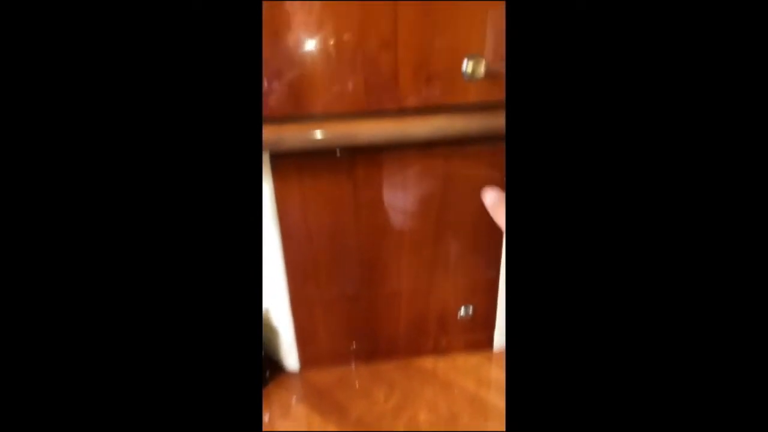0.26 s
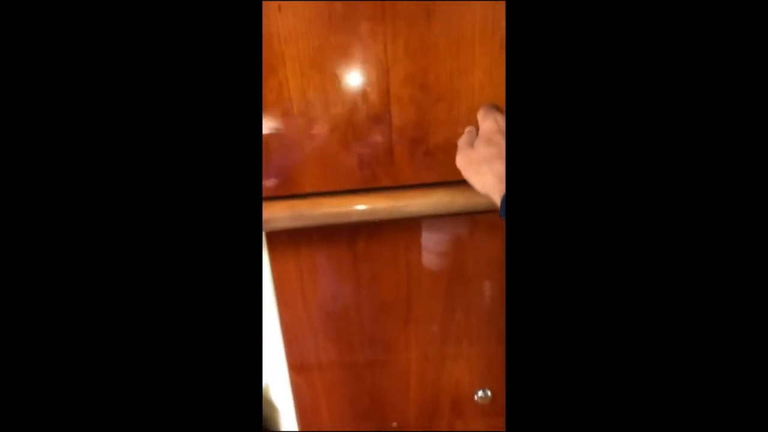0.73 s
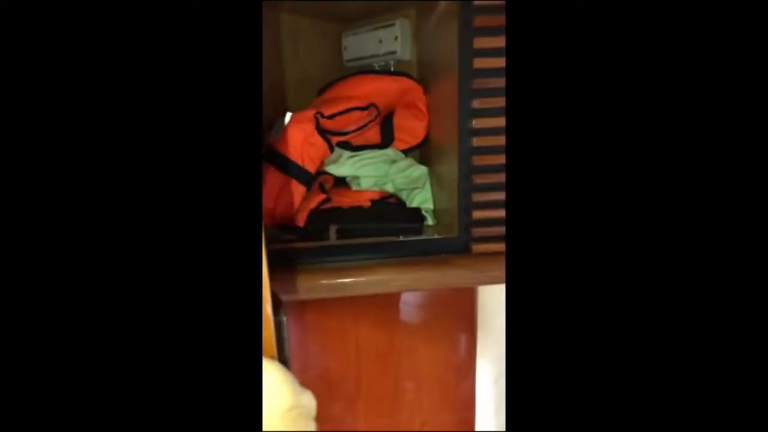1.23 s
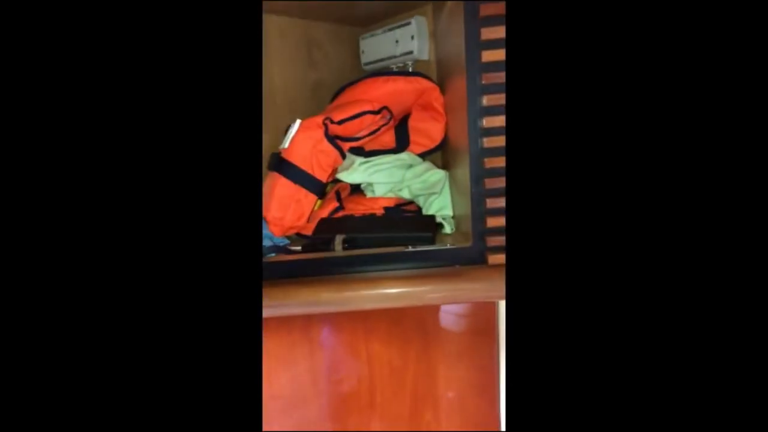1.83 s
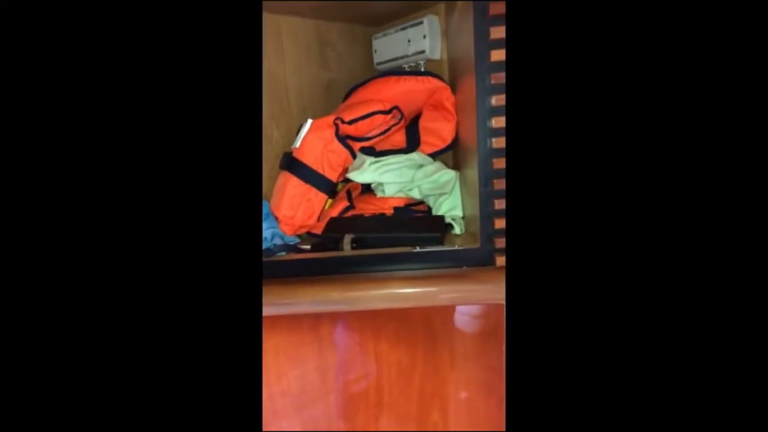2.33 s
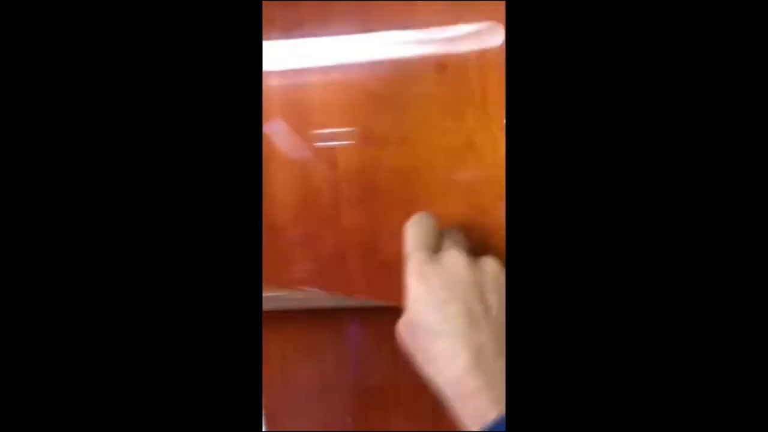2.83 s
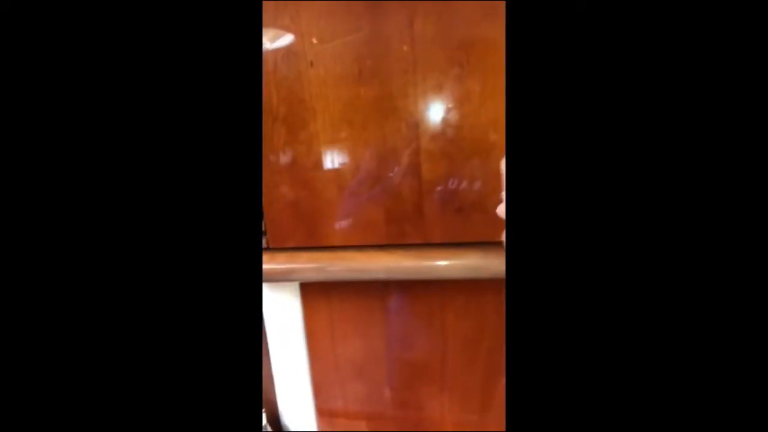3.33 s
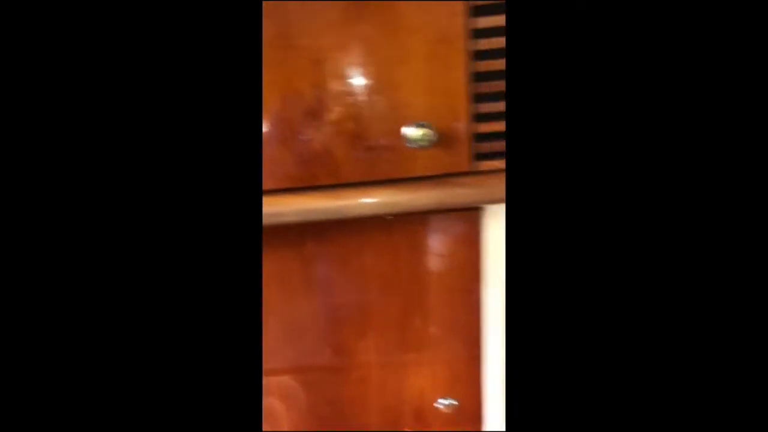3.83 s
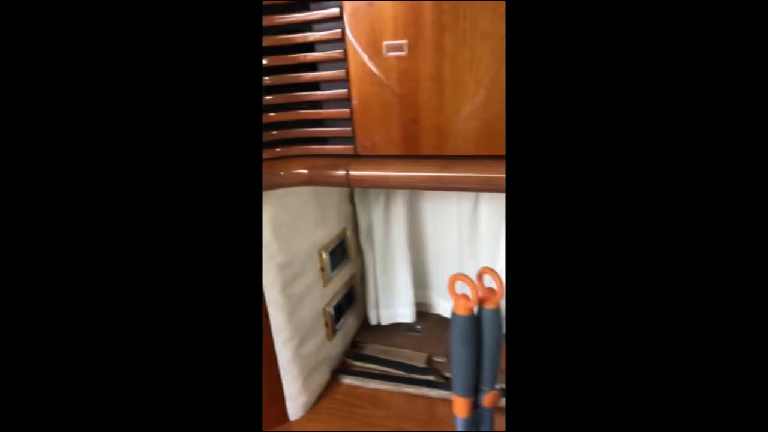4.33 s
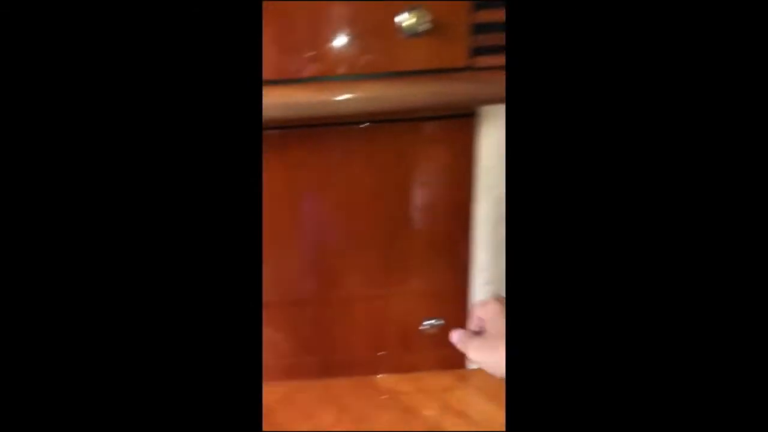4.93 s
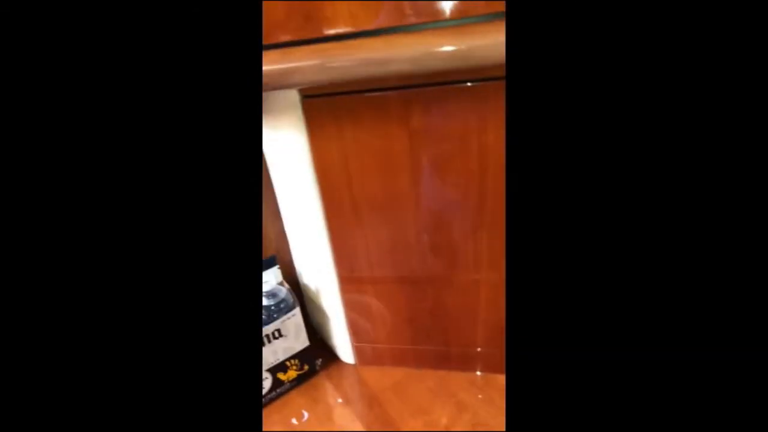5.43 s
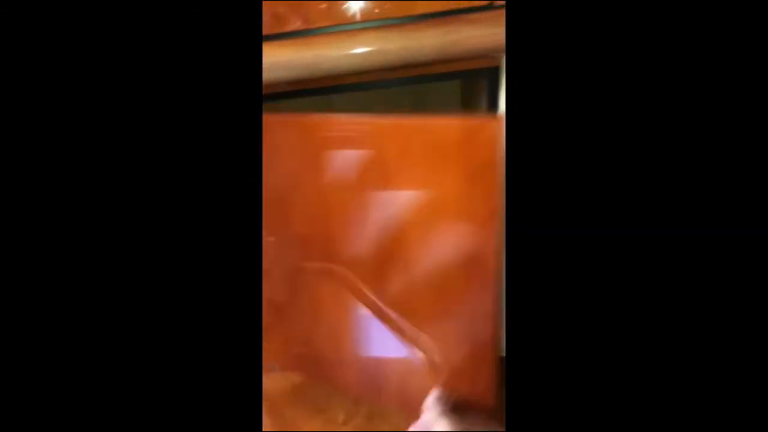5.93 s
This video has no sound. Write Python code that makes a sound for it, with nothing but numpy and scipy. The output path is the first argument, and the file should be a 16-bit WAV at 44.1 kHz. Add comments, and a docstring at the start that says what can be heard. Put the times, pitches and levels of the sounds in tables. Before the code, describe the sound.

A faint low hush fills a small, hard-walled boat cabin, heard close up with short reflections. From 0 s a hand and sleeve brush softly over wood, with a tap near 0.3 and a firmer knock near 0.7. Between 0.85 and 1.3 small wooden knocks, scrapes and metallic latch clicks accompany the door opening; a dull, sinking thud lands at 1.4. Then it is nearly quiet, with only faint touches and rubbing until about 3.1. At 3.28 the door bangs shut, hard and boomy, with a latch click, and another knock and click lock it near 3.5. Soft shelf bumps come around 4.1-4.4. At 5.3 a second latch clicks, then a rapid cluster of bright metal snaps and a wooden crack rings out at 5.5-5.6. Light knocks, rubbing and low puffs of air follow as the door swings out, with a soft thud near 6.0 and a final click-knock at 6.13.

```python
"""First a hand and sleeve brush softly over wood, then varnished locker doors are worked in a boat cabin.
A push-button latch is pressed, a door is pulled open, later banged shut and locked.
Something bumps a shelf, then a second latch snaps and its door swings out; the cabin rings briefly.
Wood and metal are ringing sine modes with bursts of noise, rubbing is a stream of noisy slips,
and the cabin, the moving air and the quiet background are shaped noise."""
import sys
import numpy as np
from scipy import signal
from scipy.fft import rfft, irfft, next_fast_len
from scipy.io import wavfile

SR = 44100
rng = np.random.default_rng(int(sys.argv[2]) if len(sys.argv) > 2 else 0)


def digitize_waveform(pressure):
    """Quantize a signal to 16-bit integers and store it at the path in sys.argv[1].

    Rows of a 2-D input are taken as channels; values are limited to [-1, 1].
    """
    field = np.atleast_2d(pressure).T
    bounded = np.clip(field, -1, 1)
    quanta = np.round(bounded * 32767).astype(np.int16)
    wavfile.write(sys.argv[1], SR, quanta)


N = 271962
TIME = np.arange(N) / SR
EDGES = 22 * 2 ** np.arange(0, 9.6, .5)   # half-octave band edges in Hz
CENTRES = np.sqrt(EDGES[1:] * EDGES[:-1])

# the quiet cabin: pitch_hz, level_db (per Hz, relative)
HUSH = [(18, -56), (30, -12.5), (141, -0.5), (184, 1.5), (215, -7), (245, -8), (394, -12), (437, -12),
        (540, -18), (702, -17.5), (988, -22), (3060, -29), (6050, -31.5), (13700, -39.5), (16000, -44)]
HUSH_DB = -65.5
# colour of the moving air: pitch_hz, level_db (per Hz, relative)
RUMBLE = [(25, -22.5), (48, -5), (75, -6), (130, -12), (250, -25.5), (600, -55)]
# puffs of air pushed over the microphone by a swinging door or arm: peak_s, level_db
PUFFS = [(.46, -57.5), (1.0, -66), (1.45, -57), (2.82, -69), (3.2, -54.5), (3.48, -58), (4.2, -62),
         (5.33, -55), (5.78, -47.5), (6.061, -42.5)]
PUFF_S, STILL_AIR_DB = 0.046, -74.5
# cabin reverberation: pitch_hz, level_db, t60_s (time to fade by 60 dB)
CABIN = [(102, -21.5, 0.6), (350, -6.5, 0.27), (1005, -7.5, 0.21), (3040, -7, .33), (7032, -11, 0.44),
         (16040, -20.5, 0.42)]
# echoes from the nearest walls, shelf and ceiling: delay_s, level_db
ECHOES = [(.0021, -20.5), (.0037, -14), (.0058, -7.5), (.0083, -10), (0.0126, -11.5), (.0161, -14.5),
          (.0223, -21.5)]

# hand, sleeve and latch barrel sliding: start_s, length_s, level_db, panel_pressure_db
STROKES = [(0, 0.069, -62.5, 4), (0, 1, -70.5, -18), (0.287, 0.098, -47, -7.5), (0.672, 0.25, -53.5, -2),
           (1.135, 0.063, -47.5, 9), (1.699, 0.28, -69, 7), (2.747, 0.99, -75.5, 17),
           (3.481, 0.093, -57, 11), (4.979, 0.53, -63, -11.5), (5.313, 0.043, -49.5, 8.5),
           (5.457, 0.079, -52.5, 2), (5.516, 0.079, -42, 2.5), (5.836, 0.11, -61, -16),
           (6.077, 0.17, -48, -7)]
RISE_SHARE = 0.43   # part of a stroke spent building up
TREBLE_DB, DULLING = -7, 0.39   # treble of a stroke; dB of it lost for each dB of pressure
# colour of the sliding hiss: pitch_hz, level_db (per Hz, relative)
FRICTION = [(300, 5.5), (600, -1.5), (1200, -1.5), (2400, -1), (4000, -1.5), (7000, -8), (11000, -9),
            (15000, -17.5)]
# hinge and push-button barrel rub and sing faintly: peak_s, rise_s, fall_s, level_db
CHAFES = [(0.859, 0.01, 0.019, -52.5), (2.97, 0.18, 0.18, -77), (3.527, 0.003, 0.014, -48.5),
          (3.607, 0.022, 0.024, -62), (5.152, 0.092, 0.41, -82), (5.46, 0.0057, 0.02, -90)]
# the notes they sing: pitch_hz, level_db, t60_s
CHAFE_MODES = [(887, 9.5, 0.066), (2200, 7, 0.053), (3040, -20.5, 0.0051), (4400, -1, 0.027)]

# blows that shake the whole locker: start_s, level_db
SHAKES = [(1.401, -53.5), (3.282, -24.5), (5.582, -53)]
# booming modes of the locker: pitch_hz, level_db, t60_s
CARCASS = [(56, -3.5, 0.32), (83, -4.5, 0.21), (107, -1, .12)]
# a swinging door is cushioned at its stop: start_s, level_db, pitch_sinking_s
THUDS = [(1.4, -39, 0.0071), (1.458, -51, 0.0065), (6.013, -47, 0.0274)]
THUD_START_HZ, THUD_END_HZ, THUD_T60_S = 308, 66, 0.17
# metal latch parts striking: start_s, ring_db, tick_db
LATCH_CLICKS = [(1.2075, -40, -34.5), (1.279, -49, -39), (3.293, -41, -28.5), (3.4805, -45, -34),
                (4.108, -56, -40.5), (5.335, -30, -32), (5.3645, -20.5, -17.5), (5.515, -28, -32),
                (5.5425, -26.5, -22.5), (5.551, -36, -30), (5.5665, -10, -16), (5.5765, -26, -13),
                (5.5815, -45, -16.5), (5.794, -54, -49), (6.034, -50, -43.5), (6.129, -48, -28.5)]
# modes of button and bolt: pitch_hz, level_db, t60_s
LATCH_MODES = [(2052, -6.5, 0.039), (2176, 1, 0.034), (2214, -3.5, 0.063), (2490, -24, 0.0048),
               (2862, -5, 0.038), (3610, -4, 0.017), (4630, -5.5, 0.014), (5380, -9, 0.016),
               (6470, -13.5, 0.015), (10700, -53, 0.0037), (13100, -37.5, .007)]

# blows on the wood; a door with play in its catch touches twice:
# start_s, strength_db, hardness_db_per_octave, weight_db, spot_hz (pitch of the struck spot), touches (count)
KNOCKS = [(.278, -40.5, 0.1, -11.5, 330, 1), (0.681, -36.5, 2.24, 3.5, 927, 1),
          (.778, -52.5, -0.5, 6.5, 358, 1), (0.848, -48, 1, 6, 1330, 1), (0.983, -45.5, -3, 2, 1900, 2),
          (1.074, -49.5, -1.5, 4, 1135, 1), (1.127, -52, 3, -15, 3040, 1),
          (1.151, -39.5, 0.5, -13, 1184, 2), (1.182, -40.5, -2.5, -8, 1650, 2),
          (1.208, -47.5, 3, -7, 4600, 1), (1.523, -58, .5, 2, 1860, 1), (2.153, -61, 1.4, -13, 3160, 1),
          (2.793, -62, 2, 19.5, 770, 1), (3.13, -68.5, -7.5, 7.5, 704, 1), (3.154, -55, -5, -5, 1315, 1),
          (3.28, -23.5, -2.25, -4, 1050, 1), (3.286, -33, -3, -7, 330, 1), (3.453, -51, -6, -19, 1155, 1),
          (3.482, -41, 0.5, 12.5, 907, 1), (3.506, -36.5, -1, -12, 1750, 2), (4.118, -44, 0.76, 6, 910, 2),
          (4.144, -47, -5.5, -6.5, 760, 1), (4.228, -53.5, -6.5, -3, 760, 1),
          (4.355, -47.5, 0, -8, 1026, 1), (5.287, -45, -0.9, -3, 1460, 1), (5.33, -40.5, -1.1, 2, 1480, 1),
          (5.406, -50, -3.5, -17, 520, 1), (5.55, -31.5, 1.9, -6, 2200, 1),
          (5.578, -25.5, -4.5, -2, 2040, 1), (5.763, -52, -1, -11, 509, 1),
          (5.795, -44.5, 1.5, 2.5, 377, 1), (5.867, -49.5, -0.5, 3, 1210, 1),
          (5.898, -56, -6.5, -8, 1320, 1), (5.966, -55.5, 1, 3, 470, 1), (6.014, -56, -7, -13, 1550, 1),
          (6.139, -42, 1, 4, 2780, 1)]
# the first of two touches: how much earlier, weaker and softer (dB per octave)
PLAY_S, TOUCH_DB, TOUCH_HARDNESS = .01, -5, -0.027
PIVOT_HZ = 1100   # hardness tilts a blow around this pitch
WEIGHT_HZ = 248   # the weight behind a blow bends the whole panel, below this pitch
VARNISH_HZ, VARNISH_DB_PER_OCTAVE = 3600, -7   # the varnish cushions the top of every blow
SPOT_DB, SPOT_OCTAVES = 7.5, 0.79   # the wood gives most readily around the pitch of the struck spot
# the crowd of short-lived higher modes in the wood: pitch_hz, level_db (per Hz, relative), t60_s
CRACK = [(301.7, 23.5, 0.029), (590, 10.5, 0.03), (1220, 12, 0.02), (2061, 10.5, 0.035), (3510, 13, 0.017),
         (5660, 5.5, 0.014), (9500, 0.5, 0.022), (14900, -0.5, 0.0088)]
# modes of the first door: pitch_hz, level_db, t60_s
UPPER_DOOR = [(108, -9, 0.23), (124.7, 0.5, 0.3), (144, 1.5, .17), (174, 7, 0.079), (194.7, -0.5, 0.033),
              (238, -9, 0.048), (294.4, -3, 0.052), (325, 0, 0.11), (360, 2, 0.075), (421, -13, .05),
              (663, -7, 0.054), (700, -6.5, 0.073), (810, -9.5, 0.097), (901, -13, 0.16), (990, -8, 0.038),
              (1150, -7, 0.031), (1254, -9, 0.029), (1610, -15.5, .035), (1719, -12, 0.075)]
# modes of the shelf: pitch_hz, level_db, t60_s
SHELF = [(78.5, -8, 0.38), (87, -25, 0.079), (106.6, -5.5, 0.25), (169.6, 5, 0.12), (181.7, 5, 0.1),
         (286, 5, 0.047), (330, 0.5, 0.14), (441, 0, 0.082), (520, -4.5, 0.1), (670, -6, 0.018),
         (765, -9, 0.074), (924, -1, 0.024)]
# modes of the second door: pitch_hz, level_db, t60_s
LOWER_DOOR = [(106, -13, 0.24), (133.3, -6.5, 0.24), (168, 4.5, 0.099), (179, 4, 0.05), (194, 2.5, 0.063),
              (261.4, -5.5, 0.091), (370.5, 3.5, 0.07), (414, 1.5, 0.048), (453, 4, 0.044),
              (538, -2.5, 0.076), (732, -27, 0.1), (1230, -4, 0.017), (1455, -13, 0.13), (1490, 6, 0.005)]
# what the hand is working on: start_s, end_s, modes (one of the three tables above)
PANELS = [(0, 4, UPPER_DOOR), (4, 5, SHELF), (5, 7, LOWER_DOOR)]


def from_db(db):
    """Turn decibels into a gain."""
    return 10 ** (np.asarray(db) / 20)


def white():
    """Plain white noise."""
    return rng.standard_normal(N)


def rms_one(x):
    """Scale to unit power."""
    return x / np.sqrt(np.mean(x ** 2) + 1e-20)


def at_hz(table, hz, order=1):
    """Read one column of a table at any pitch, on a log-frequency axis."""
    table = np.array(table)
    return np.interp(np.log(hz), np.log(table[:, 0]), table[:, order])


def filtered(x, order, hz, kind):
    """Keep one range of pitches with a Butterworth filter."""
    return signal.sosfilt(signal.butter(order, hz, kind, fs=SR, output="sos"), x)


def band(x, k):
    """Keep the k-th half-octave band."""
    return filtered(x + 1e-18, 2, EDGES[k:k + 2], "band")


def smooth(x, seconds):
    """Follow the input with a one-pole lag."""
    r = np.exp(-1 / (seconds * SR))
    return signal.lfilter([1 - r], [1, -r], x)


def delayed(x, seconds):
    """Play the sound later."""
    return np.pad(x, (int(seconds * SR), 0))[:N]


def coloured(spectrum, source):
    """Shape a white source by a spectrum; rms 1."""
    size = next_fast_len(N + SR // 2)
    hz = np.maximum(np.fft.rfftfreq(size, 1 / SR), 1)
    gain = from_db(at_hz(spectrum, hz)) * (hz > EDGES[0])
    return rms_one(irfft(rfft(source, size) * gain, size)[:N])


def clicks(times, db):
    """Place one impulse for each contact."""
    out = np.full(N, 1e-18)
    place = np.clip(np.round(times * SR).astype(int), 0, N - 1)
    out[place] = from_db(db)
    return out


def ring(x, hz, t60):
    """A unit click sets a sine of height 1 ringing."""
    r = 1000 ** (-1 / (t60 * SR))   # decay per sample
    w = 2 * np.pi * hz / SR
    return signal.lfilter([0, np.sin(w)], [1, -2 * r * np.cos(w), r * r], x)


def burst(x, t60):
    """Each click starts a puff of noise that dies away."""
    r = 1000 ** (-1 / (t60 * SR))
    return signal.lfilter([1], [1, -r], x) * white()


def resonate(x, modes):
    """Drive a set of modes with a steady source; rms 1."""
    # alternate signs keep neighbouring modes from all pushing the same way
    return rms_one(sum((-1) ** k * from_db(db) * ring(x, hz, t60) for k, (hz, db, t60) in enumerate(modes)))


def swell(s, rise, fall):
    """Pressure of one stroke: it sets in quickly and trails off."""
    before = ((s - TIME) / rise) ** 4
    after = (np.abs(TIME - s) / fall) ** 1.5 * 1.3
    return np.exp(-np.where(TIME < s, before, after))


def quiet_cabin():
    """A faint steady hush of shaped noise fills the cabin."""
    return from_db(HUSH_DB) * coloured(HUSH, white())


def draught():
    """Puffs of air swell and fade over nearly still air."""
    puffs = sum(from_db(db) * np.exp(-np.abs(TIME - s) / PUFF_S) for s, db in PUFFS)
    return (from_db(STILL_AIR_DB) + puffs) * coloured(RUMBLE, white())


def cabin(x, gap_s, build_s):
    """Close panelled walls scatter sound: in each band the stored energy builds up and dies away."""
    late = delayed(x, gap_s)
    tail = np.zeros(N)
    for k, hz in enumerate(CENTRES):
        building = smooth(band(late, k) ** 2, build_s)
        energy = smooth(building, at_hz(CABIN, hz, order=2) / np.log(1e6))   # t60 to lag time
        tail += from_db(at_hz(CABIN, hz)) * np.sqrt(np.abs(energy)) * rms_one(band(white(), k))
    return tail


def walls(x, level_db, low_hz):
    """Small varnished surfaces within arm's reach send back early echoes; long waves bend round them."""
    bright = filtered(x, 2, low_hz, "high")
    return x + sum(from_db(db + level_db) * delayed(bright, s) for s, db in ECHOES)


def rubbing(grain_db, panel_db, shelf_hz):
    """Sliding is a stream of tiny slips; they hiss and also stir the modes of panel and fittings."""
    grain = np.repeat(rng.standard_normal(N // 64 + 1), 64)[:N]   # a new strength every 64 samples
    slips = white() * from_db(grain_db * grain)
    hiss = filtered(coloured(FRICTION, slips), 2, 200, "high")
    # forward and backward filtering keeps the dull part in step with the hiss
    dull = signal.sosfiltfilt(signal.butter(2, shelf_hz, fs=SR, output="sos"), hiss)
    bright = hiss - dull
    panel = sum(resonate(slips, modes) * ((TIME >= start) & (TIME < end)) for start, end, modes in PANELS)
    chafing = sum(from_db(db) * swell(s, rise, fall) for s, rise, fall, db in CHAFES)
    out = resonate(slips, CHAFE_MODES) * chafing
    for s, length, db, pressure_db in STROKES:
        rise = RISE_SHARE * length
        treble = from_db(TREBLE_DB - DULLING * pressure_db)
        sliding = dull + treble * bright + from_db(pressure_db + panel_db) * panel
        out += from_db(db) * swell(s + rise, rise, length - rise) * sliding
    return out


def carcass():
    """Heavy blows make the locker and the air in it boom."""
    times, level = np.transpose(SHAKES)
    return sum((-1) ** k * ring(clicks(times, level + db), hz, t60) for k, (hz, db, t60) in enumerate(CARCASS))


def thuds():
    """The short bending waves of a cushioned blow arrive first, so its pitch sinks as it dies."""
    out, t = np.zeros(N + SR // 4), TIME[:SR // 4]
    for s, db, sink_s in THUDS:
        hz = THUD_END_HZ + (THUD_START_HZ - THUD_END_HZ) * np.exp(-t / sink_s)
        fade = from_db(db - 60 * t / THUD_T60_S)
        out[int(s * SR):][:len(t)] += fade * np.sin(2 * np.pi * np.cumsum(hz) / SR)
    return out[:N]


def latches(ring_db, spike_db, chatter_db, chatter_t60, low_hz, high_hz):
    """Metal on metal gives a sharp spike, a brief chatter, and the ring of button and bolt."""
    times, level, tick = np.transpose(LATCH_CLICKS)
    chatter = burst(clicks(times, tick + chatter_db), chatter_t60)
    contact = clicks(times, tick + spike_db) + chatter
    out = filtered(contact, 1, [low_hz, min(high_hz, .45 * SR)], "band")
    for k, (hz, db, t60) in enumerate(LATCH_MODES):
        # low modes follow the ring level, high modes the tick: hard contacts favour the high ones
        hard = np.interp(hz, [3000, 4600], [0, 1])
        strike = level + hard * (tick - level)
        out += (-1) ** k * ring(clicks(times, strike + db + ring_db), hz, t60)
    return out


def blows():
    """List every contact with the wood: start_s, strength_db, hardness, weight_db, spot_hz."""
    first = [(s - PLAY_S, db + TOUCH_DB, hard + TOUCH_HARDNESS, weight, hz)
             for s, db, hard, weight, hz, touches in KNOCKS if round(touches) == 2]
    return np.vstack([np.array(KNOCKS)[:, :-1], first])


def force(hz):
    """Level in dB of each blow at one pitch: hard blows reach higher, heavy ones lower."""
    _, db, hardness, weight_db, spot_hz = blows().T
    tilt = hardness * np.log2(hz / PIVOT_HZ)
    cushion = VARNISH_DB_PER_OCTAVE * np.maximum(np.log2(hz / VARNISH_HZ), 0)
    heft = weight_db / (1 + (hz / WEIGHT_HZ) ** 6)
    spot = SPOT_DB * np.exp(-(np.log2(hz / spot_hz) / SPOT_OCTAVES) ** 2)
    return db + tilt + cushion + heft + spot


def spots(level_db, cycles, longest_s):
    """Each blow also rings the edge, knob or batten that it lands on, for a few dozen cycles."""
    out, t = np.zeros(N + SR // 4), TIME[:SR // 4]
    times, *_, pitches = blows().T
    for s, hz, db in zip(times, pitches, force(pitches)):
        fade = from_db(db + level_db - 60 * t / min(cycles / hz, longest_s))
        out[int(s * SR):][:len(t)] += fade * np.sin(2 * np.pi * hz * t)
    return out[:N]


def doors(modes_db, crack_db, spread_db, contact_cycles):
    """A blow rings the panel that it lands on, each mode at a slightly random level."""
    times = blows()[:, 0]
    out = np.zeros(N)
    for start, end, modes in PANELS:
        here = (times >= start) & (times < end)
        variation = rng.normal(0, 1, (len(times), len(modes)))
        for k, (hz, db, t60) in enumerate(modes):
            level = force(hz) + db + modes_db + spread_db * variation[:, k]
            out += (-1) ** k * ring(clicks(times[here], level[here]), hz, t60)
    for k, hz in enumerate(CENTRES):
        if hz > CRACK[0][0]:
            # bending waves spread through the wood more slowly the lower they are
            contact = clicks(times, force(hz) + at_hz(CRACK, hz) + crack_db)
            push = smooth(contact, contact_cycles / hz)
            out += band(burst(push, at_hz(CRACK, hz, order=2)), k)
    return out


def scene():
    """Doors, latches and hand in the cabin, over moving air and a faint hush."""
    wood = doors(modes_db=-5, crack_db=-3.5, spread_db=2.85, contact_cycles=3.2)
    wood = wood + spots(level_db=-9, cycles=51, longest_s=0.12) + carcass() + thuds()
    metal = latches(ring_db=-8.5, spike_db=1.0, chatter_db=-12, chatter_t60=0.025, low_hz=1470, high_hz=9410)
    hand = rubbing(grain_db=1.5, panel_db=-4.0, shelf_hz=4350)
    near = walls(wood + metal + hand, level_db=-6, low_hz=444)
    tail = from_db(-2) * cabin(near, gap_s=0.00093, build_s=0.00067)
    return (near + tail + draught() + quiet_cabin())[None]   # one channel


def record(dry):
    """The microphone drops the deepest bass; the top is cut steeply above 16 kHz."""
    thin = filtered(dry, 4, 36, "high")
    return signal.sosfilt(signal.ellip(10, .1, 80, 16000, fs=SR, output="sos"), thin)


dry = scene()
out = record(dry)
digitize_waveform(out)
```